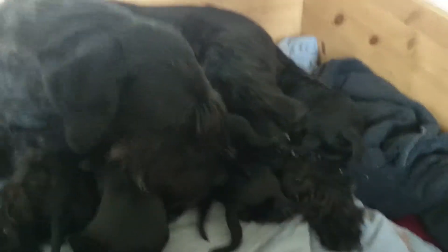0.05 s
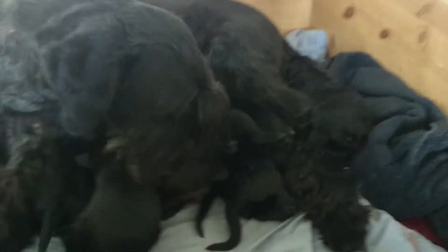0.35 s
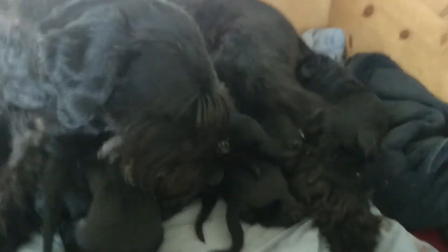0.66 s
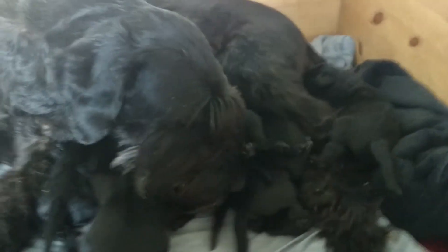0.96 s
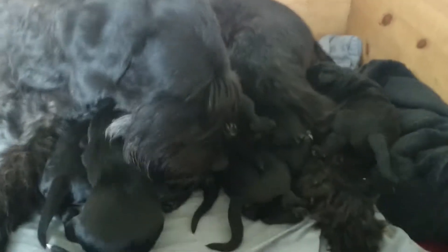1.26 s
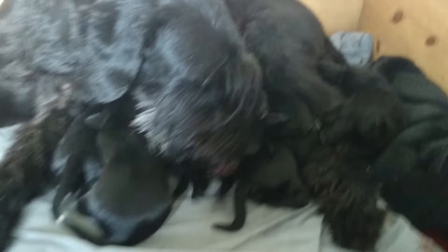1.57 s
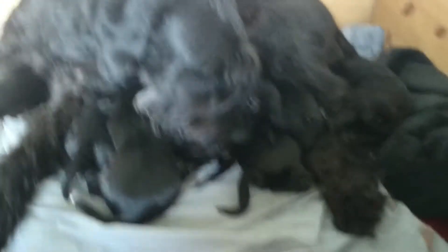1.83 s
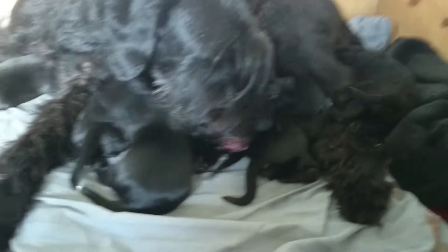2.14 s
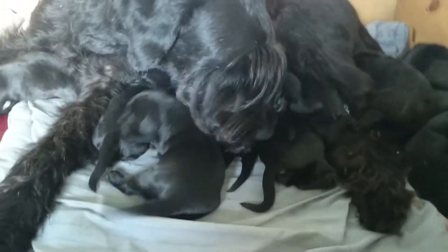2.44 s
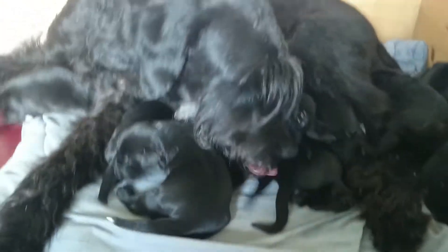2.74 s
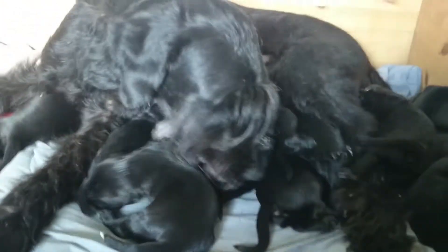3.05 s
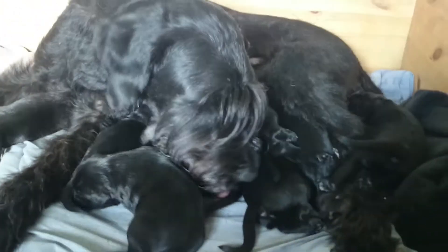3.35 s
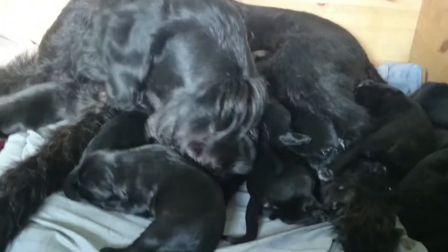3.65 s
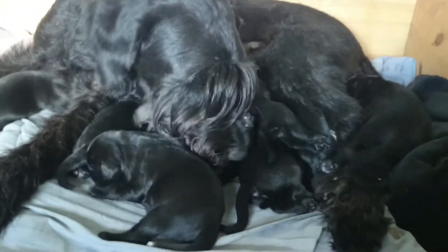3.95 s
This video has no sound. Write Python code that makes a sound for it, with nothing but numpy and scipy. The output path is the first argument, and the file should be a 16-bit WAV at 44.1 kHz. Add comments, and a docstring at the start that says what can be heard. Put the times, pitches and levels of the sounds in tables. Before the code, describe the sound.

Soft wet licking from a mother dog, with rustling bedding and a few small puppy whimpers.

```python
"""Mother dog licking her puppies

A dog licks her newborn puppies on cloth bedding in a wooden box indoors. Her tongue crackles
through wet fur and smacks, she snuffles, and bodies slide and bump on the cloth. A puppy's
vocal folds give three arched whimpers and a few small grunts. The right microphone is duller,
is brushed by cloth and carries a slow rumble."""
import sys
import numpy as np
from scipy import signal
from scipy.fft import rfft, irfft
from scipy.io import wavfile

SR = 44100
rng = np.random.default_rng(int(sys.argv[2]) if len(sys.argv) > 2 else 0)


def to_wav(sig):
    """Store sig (one row per channel, or 1-D mono) as 16-bit WAV at the path in sys.argv[1].

    Samples outside -1..1 are clipped; the rate is SR.
    """
    pcm = np.clip(np.atleast_2d(sig), -1, 1) * 32767
    pcm = np.round(pcm).astype(np.int16)
    wavfile.write(sys.argv[1], SR, pcm.T)  # frames by channels


N = 176400
T = np.arange(N) / SR


def from_db(db):
    """Decibels to gain."""
    return 10 ** (np.asarray(db) / 20)


def unit_rms(x):
    """Scale to unit power."""
    return x / np.sqrt(np.mean(x ** 2) + 1e-20)


def gain_at(spectrum, hz):
    """Gain of a (f/Hz, level/dB) curve, interpolated in log frequency."""
    f, db = np.transpose(spectrum)
    return from_db(np.interp(np.log(hz + 1e-6), np.log(f), db))


def colour(x, spectrum):
    """Zero-phase filter by a spectrum."""
    size = 2 * N
    return irfft(rfft(x, size) * gain_at(spectrum, np.fft.rfftfreq(size, 1 / SR)))[..., :N]


def butter(x, hz, kind="low", order=2):
    """Butterworth filter."""
    return signal.sosfilt(signal.butter(order, hz, kind, fs=SR, output="sos"), x)


def drift(rate_hz):
    """Smooth random wander, unit RMS."""
    return unit_rms(butter(rng.standard_normal(N + SR), rate_hz)[SR:])


def swell(start_s, length_s, edge):
    """Rise, hold, release; edge is a fraction of the length."""
    progress = (T - start_s) / length_s
    return np.clip(np.minimum(progress, 1 - progress) / edge + .5, 0, 1) ** 2


def stereo_noise(size=N, split_hz=1700):
    """Noise with shared bass and independent treble."""
    bass = butter(rng.standard_normal(size), split_hz)
    return bass + butter(rng.standard_normal((2, size)), split_hz, "high")


def crackle(spectrum, per_s, spread_db, grain_s, steady):
    """Tiny uneven bursts over a steady hiss, coloured, unit RMS."""
    hits = rng.random(N) < per_s / SR
    sizes = hits * from_db(spread_db * np.minimum(rng.exponential(1, N), 3.5))
    power = signal.lfilter([1], [1, -np.exp(-1 / (grain_s * SR))], sizes ** 2 + 1e-12)
    grains = np.sqrt(power / power.mean() + steady) * stereo_noise()
    return unit_rms(colour(grains, spectrum))


def burst(start_s, hz, width_oct, attack_s, decay_s, skirt_db):
    """Decaying noise band on a broad skirt; higher bands are wider in stereo."""
    size = 8192
    t, f = T[:size], np.fft.rfftfreq(size, 1 / SR) + 1
    peak = np.exp(-.5 * (np.log2(f / hz) / width_oct) ** 2)
    skirt = from_db(skirt_db) / (1 + (f / hz / 2) ** 2) * f / (f + hz / 2)
    common, left, right = irfft(rfft(rng.standard_normal((3, size))) * (peak + skirt))
    coherence = 1 / (1 + (hz / 2000) ** 2)
    envelope = (1 - np.exp(-t / attack_s)) * np.exp(-t / decay_s)
    puff = (np.sqrt(coherence) * common + np.sqrt(1 - coherence) * np.array([left, right])) * envelope
    puff *= np.sqrt(np.mean(envelope ** 2) / np.mean(puff ** 2, axis=1, keepdims=True))
    return np.pad(puff, ((0, 0), (int(start_s * SR), N)))[:, :N]


# Room noise: f/Hz, level/dB
FLOOR_SPECTRUM = [(20, 14), (120, 12), (700, -33), (3500, -30), (5300, -66), (15000, 7.5)]


def room_noise(level_db=-58.5, unshared=0.82):
    """Quiet steady noise, partly separate at each microphone."""
    noise = stereo_noise() + unshared * rng.standard_normal((2, N))
    return from_db(level_db) * unit_rms(colour(noise, FLOOR_SPECTRUM))


# Rumble spectrum: f/Hz, level/dB
RUMBLE_SPECTRUM = [(1, -19), (5.5, 0), (17, -19.5), (40, -43), (80, -46.5), (130, -62.5), (400, -86.5)]
# Rumble envelope: t/s, level/dB
RUMBLE_LEVELS = [(0, -25), (1.1, -19.5), (2.2, -21.5), (4, -31)]


def rumble(fade_s=0.0091):
    """Slow, mostly subsonic microphone rumble."""
    noise = irfft(rfft(rng.standard_normal(N)) * gain_at(RUMBLE_SPECTRUM, np.fft.rfftfreq(N, 1 / SR)))
    fade = np.clip(np.minimum(T, T[-1] - T) / fade_s, 0, 1)
    return from_db(np.interp(T, *np.transpose(RUMBLE_LEVELS))) * unit_rms(noise) * fade


# Cloth on the microphone: t/s, level/dB
BRUSH_LEVELS = [(.2, -72), (.42, -62), (.66, -51.5), (1.05, -62), (1.6, -79)]


def mic_brush(hz=5350):
    """Cloth brushes the right microphone: a narrow swish."""
    swish = signal.lfilter(*signal.iirpeak(hz, Q=5.5, fs=SR), rng.standard_normal(N))
    envelope = from_db(np.interp(T, *np.transpose(BRUSH_LEVELS)))
    return np.array([np.zeros(N), envelope * unit_rms(swish)])


# Cloth dragged under the bodies: t/s, rub level/dB, hiss level/dB
DRAG_LEVELS = [(0, -54.5, -81), (.2, -65.5, -61), (.44, -57.5, -63), (.47, -52.5, -69), (.58, -53.5, -52),
               (.66, -64, -51.5), (.8, -65, -51.5), (1.2, -60.5, -60.5), (1.38, -61, -55.5),
               (1.46, -71.5, -70), (1.55, -70, -62.5), (2.05, -63, -62.5), (2.4, -67.5, -70),
               (2.722, -66, -72), (2.849, -86, -61.5), (3.05, -62.5, -76), (4, -64.5, -64)]
# Low rub: f/Hz, level/dB
RUB_SPECTRUM = [(130, -4.5), (330, -3.5), (600, -6), (1800, -17.5), (8000, -14)]
# Sliding hiss: f/Hz, level/dB
HISS_SPECTRUM = [(500, -9.5), (1500, -4.5), (4300, -4.5), (6400, -3.5), (10000, -5), (15000, -1.5)]
# Bumps on the bedding: t/s, level/dB, f/Hz
SOFT_BUMPS = [(.012, -52, 390), (.165, -58.5, 656), (.25, -53.5, 560), (.335, -52.5, 444), (.53, -51, 650),
              (.585, -50, 414), (.71, -52.5, 720), (1.01, -51.5, 222), (1.075, -54.5, 546),
              (1.515, -53, 238), (1.939, -57, 740), (2.91, -54, 263), (3.785, -57, 373)]


def bedding():
    """Cloth rubs in small slips, hisses as it slides and takes soft bumps."""
    times, rub_db, hiss_db = np.transpose(DRAG_LEVELS)
    rub = crackle(RUB_SPECTRUM, per_s=200, spread_db=2, grain_s=0.0033, steady=0.26)
    hiss = crackle(HISS_SPECTRUM, per_s=2200, spread_db=12, grain_s=0.0019, steady=4.8)
    drag = from_db(np.interp(T, times, rub_db)) * rub + from_db(np.interp(T, times, hiss_db)) * hiss
    bumps = sum(from_db(db) * burst(t, hz, width_oct=0.41, attack_s=0.00066, decay_s=0.022, skirt_db=0)
                for t, db, hz in SOFT_BUMPS)
    return drag + bumps


# Nostril puffs: t/s, length/s, level/dB
PUFFS = [(1.245, 0.0707, -55.5), (1.371, 0.037, -56.5)]
# Puff spectrum: f/Hz, level/dB
PUFF_SPECTRUM = [(200, 4), (480, 3.5), (1020, 2), (1350, -14.5), (1750, -2), (2100, -2), (2600, -24),
                 (14000, -46)]
# Nasal resonances: f/Hz, width/Hz, level/dB
WHEEZE_MODES = [(800, 1100, 0.5), (1560, 190, -3), (2460, 320, -3.5), (3350, 310, 0), (4240, 430, -2.5),
                (5500, 520, -4)]


def nose(sniff_db=-57.5):
    """The mother puffs through her nostrils; one longer sniff wheezes in the narrow passages."""
    air, wheeze = stereo_noise(), 0
    flow = sum(from_db(db) * swell(t, length_s, edge=0.11) for t, length_s, db in PUFFS)
    for hz, width_hz, db in WHEEZE_MODES:
        b, a = signal.iirpeak(hz, hz / width_hz, fs=SR)
        wheeze += from_db(db) * signal.lfilter(b, a, signal.lfilter(b, a, air))
    sniff = from_db(sniff_db) * swell(start_s=3.105, length_s=0.17, edge=0.39)
    return flow * unit_rms(colour(air, PUFF_SPECTRUM)) + sniff * unit_rms(wheeze)


# Tongue strokes: t/s, length/s, level/dB
STROKES = [(0.233, 0.045, -58.5), (0.462, 0.48, -55.5), (1.03, 0.082, -56), (1.344, 0.12, -63.5),
           (1.464, 0.15, -54), (1.582, 0.31, -56.5), (2.105, 0.23, -59), (2.408, 0.18, -57.5),
           (2.791, 0.12, -55), (2.897, 0.13, -60), (3.686, 0.044, -59.5)]
# Wet fur, also the puppy's rasp: f/Hz, level/dB
WET_SPECTRUM = [(150, -2.5), (300, -4), (650, -3), (1300, -16.5), (2500, -13), (5200, -8), (11000, -6.5),
                (15000, -17.5)]
# Lip and tongue smacks: t/s, level/dB, cavity f/Hz, width/oct
MOUTH_SMACKS = [(0.256, -47, 4800, 0.8), (.536, -33.5, 9400, 0.46), (.609, -36.5, 7300, 0.31),
                (1.382, -44, 3000, 0.31), (1.402, -30.5, 11900, 0.62), (1.404, -45.5, 2030, 0.086),
                (1.881, -43, 2100, 0.17), (1.884, -38, 5700, 0.28), (1.893, -39.5, 5050, 0.068),
                (2.572, -46, 2380, 1), (2.763, -48, 5300, 0.21), (3.241, -45, 8360, 0.39),
                (3.85, -49.5, 2600, 0.64)]
# Hair flicks: t/s, level/dB
HAIR_FLICKS = [(0.46, -42), (0.526, -43), (.531, -38), (.573, -40), (1.533, -36), (1.598, -42),
               (1.607, -39)]


def tongue(splash_db=-8.5):
    """Wet hairs crackle under each stroke and flick off the tongue; saliva films snap in the mouth."""
    strokes = sum(from_db(db) * swell(t, length_s, edge=0.58) for t, length_s, db in STROKES)
    out = strokes * crackle(WET_SPECTRUM, per_s=800, spread_db=3.5, grain_s=0.0003, steady=0.5)
    for t, db, hz, width_oct in MOUTH_SMACKS:
        smack = burst(t, hz, width_oct, attack_s=0.00056, decay_s=0.0033, skirt_db=splash_db)
        out += from_db(db) * smack
    for t, db in HAIR_FLICKS:
        flick = burst(t, hz=9000, width_oct=0.68, attack_s=0.0002, decay_s=0.0014, skirt_db=splash_db)
        out += from_db(db) * flick
    return out


# Puppy's throat response: f/Hz, level/dB
THROAT_SPECTRUM = [(250, -9), (480, 7), (700, -5.5), (850, 6), (1030, 5.5), (1270, -0.5), (1560, -3),
                   (1930, -5), (2120, -6), (2600, -22.5), (3300, -57), (7500, -22), (14000, -44)]


def voice(times, hz, db, jitter, tilt_db_oct, shimmer_db=2, rasp_db=-24, ramp_s=0.008):
    """Vocal-fold harmonics shaped by the throat, plus a rasp pulsed at the pitch."""
    active = (T > times[0] - ramp_s) & (T < times[-1] + ramp_s)
    t = T[active]
    pitch_hz = np.interp(t, times, hz) * (1 + jitter * drift(rate_hz=170)[active])
    phase = 2 * np.pi * np.cumsum(pitch_hz) / SR
    harmonics = np.arange(1, 16)[:, None]
    gains = gain_at(THROAT_SPECTRUM, harmonics * pitch_hz) * from_db(tilt_db_oct * np.log2(harmonics))
    tone = (gains * np.cos(harmonics * phase)).sum(0) / np.sqrt((gains ** 2).sum(0) / 2)
    breath = unit_rms(colour(rng.standard_normal(N), WET_SPECTRUM))[active]
    rasp = from_db(rasp_db) * breath * (1 + np.cos(phase))
    gate = np.clip(np.minimum(t - times[0], times[-1] - t) / ramp_s + 1, 0, 1)
    level_db = np.interp(t, times, db) + shimmer_db * drift(rate_hz=55)[active]
    out = np.zeros(N)
    out[active] = (tone + rasp) * gate * from_db(level_db)
    return out


# One contour per whimper: t/s, pitch/Hz, level/dB
WHIMPER_CONTOURS = [
    [(2.105, 512, -47.5), (2.123, 528.5, -42), (2.139, 578.4, -41.5), (2.167, 660, -40),
     (2.189, 629, -41.5), (2.207, 544, -41), (2.225, 478, -47.5)],
    [(3.316, 405.6, -49), (3.338, 468.5, -39.5), (3.356, 499.6, -39), (3.376, 513.7, -37),
     (3.396, 500, -41), (3.412, 498, -46.5), (3.424, 311, -46)],
    [(3.641, 349, -56), (3.655, 395.3, -46.5), (3.671, 421.4, -41.5), (3.683, 406, -44.5),
     (3.695, 389, -54)],
]
# Per whimper: leftward pan/dB, tilt/(dB/oct)
WHIMPER_PAN_TILT = [(1, 1.4), (0.5, 2), (0.5, 0.5)]
# Grunts: t/s, length/s, top pitch/Hz, level/dB
SHORT_GRUNTS = [(2.449, 0.034, 306.7, -48), (2.601, 0.032, 211.5, -54.5), (3.905, 0.0134, 330.4, -51)]


def puppy(grunt_rise=0.147, right_lag_s=0.0002):
    """Whimpers arch up and fall; grunts are lower, darker and rougher."""
    out = np.zeros((2, N))
    for contour, (pan_db, tilt_db_oct) in zip(WHIMPER_CONTOURS, WHIMPER_PAN_TILT):
        whimper = voice(*np.transpose(contour), jitter=0.0075, tilt_db_oct=tilt_db_oct)
        out += whimper * from_db([[pan_db], [-pan_db]])
    progress = np.linspace(0, 1, 9)
    for t, length_s, top_hz, db in SHORT_GRUNTS:
        pitch_hz = top_hz * (1 - grunt_rise * (1 - progress) ** 2)
        level_db = db - 7 * (1 - np.sin(np.pi * progress ** 2.4))
        out += voice(t + length_s * progress, pitch_hz, level_db, jitter=0.043, tilt_db_oct=-10)
    return np.array([out[0], np.interp(T - right_lag_s, T, out[1])])


def reverb(x, t60_s=0.24, level_db=-5.5, lowpass_hz=4940, predelay_s=0.004):
    """Diffuse tail of a small room."""
    t = T[:SR // 2]
    tail = stereo_noise(len(t), split_hz=293) * from_db(-60 * t / t60_s) * (t > predelay_s)
    tail /= np.sqrt((tail ** 2).sum(1, keepdims=True))
    tail = butter(tail, lowpass_hz, order=1)
    return from_db(level_db) * signal.fftconvolve(x, tail, axes=1)[:, :N]


def scene():
    """The dogs in their room, with room noise and the brushed microphone."""
    dogs = puppy() + tongue() + nose() + bedding()
    return room_noise() + dogs + reverb(dogs) + mic_brush()


# Left microphone: f/Hz, level/dB
LEFT_RESPONSE = [(3000, 2.5), (10500, -1), (12000, -11), (13500, -6), (15500, -24)]
# Right microphone: f/Hz, level/dB
RIGHT_RESPONSE = [(2000, 3), (4600, 0.5), (5400, 3.5), (6100, -4), (7300, -9), (12000, -35), (13500, -33)]


def record(dry, stopband_hz=16100):
    """Two coloured microphones, rumble on the right, then a steep low-pass."""
    left = colour(dry[0], LEFT_RESPONSE)
    right = colour(dry[1], RIGHT_RESPONSE) + rumble()
    lowpass = signal.cheby2(14, 60, stopband_hz, fs=SR, output="sos")
    return signal.sosfilt(lowpass, np.array([left, right]))


dry = scene()
out = record(dry)
to_wav(out)
```